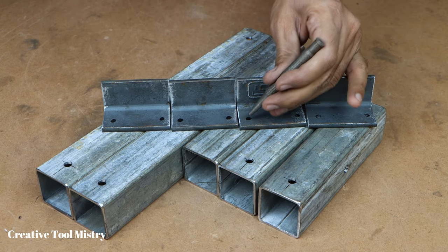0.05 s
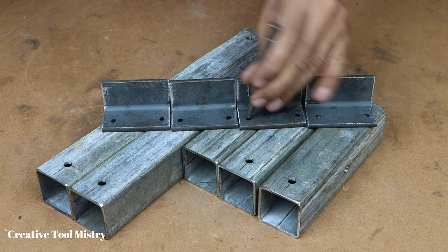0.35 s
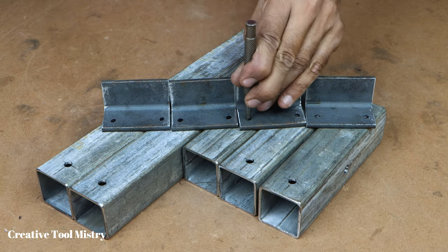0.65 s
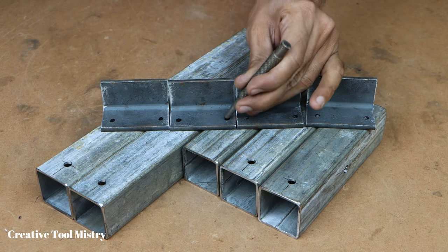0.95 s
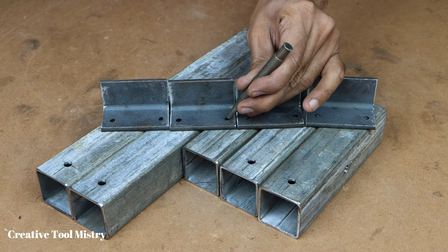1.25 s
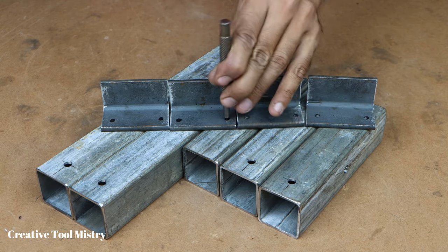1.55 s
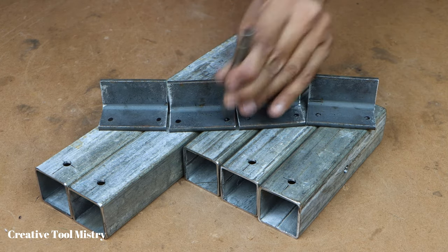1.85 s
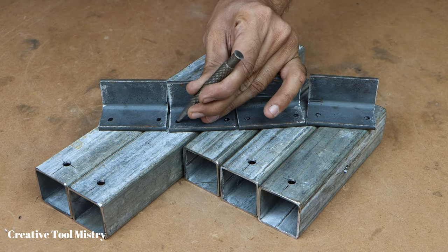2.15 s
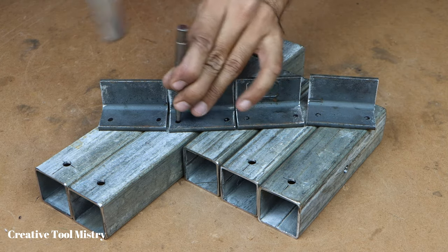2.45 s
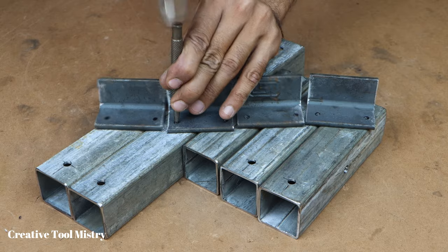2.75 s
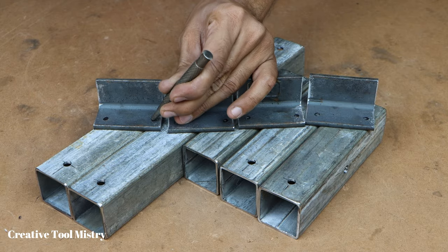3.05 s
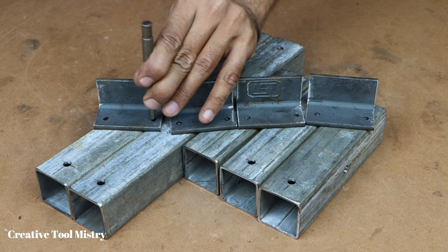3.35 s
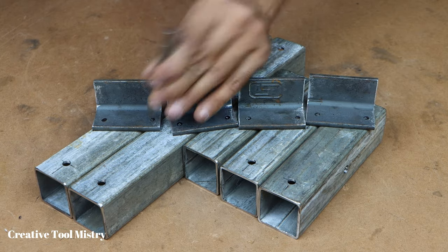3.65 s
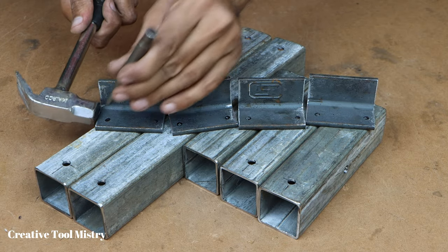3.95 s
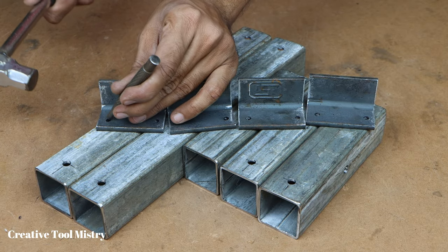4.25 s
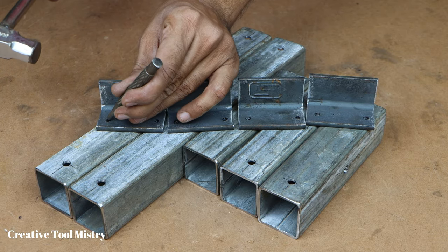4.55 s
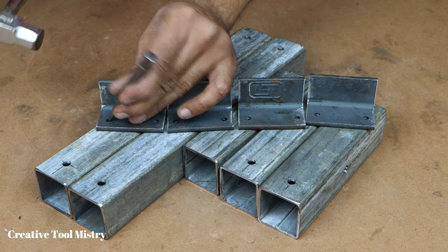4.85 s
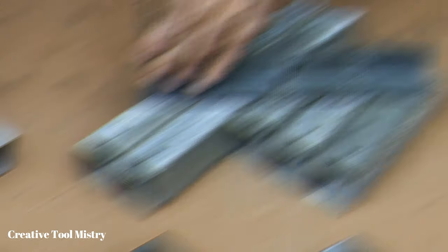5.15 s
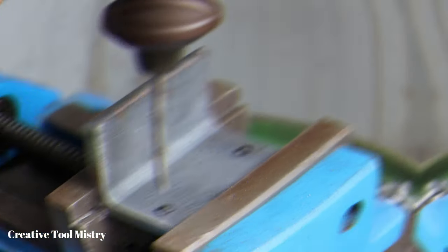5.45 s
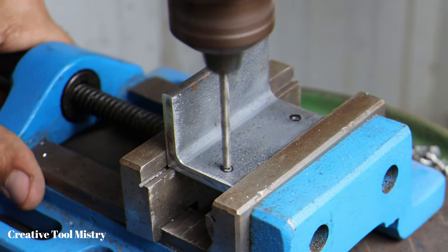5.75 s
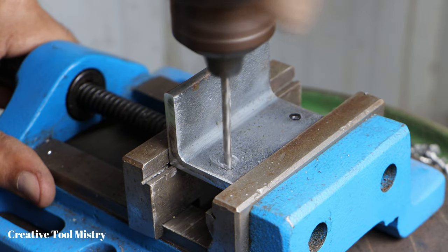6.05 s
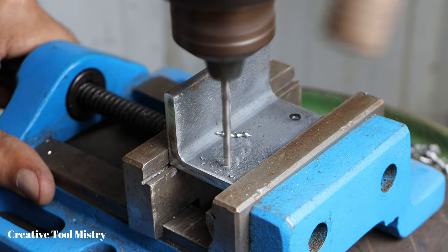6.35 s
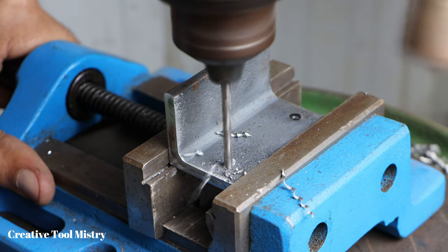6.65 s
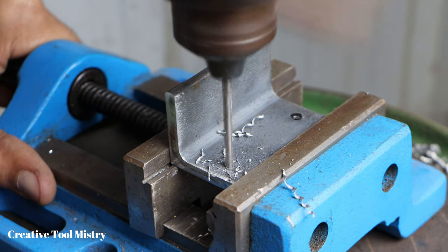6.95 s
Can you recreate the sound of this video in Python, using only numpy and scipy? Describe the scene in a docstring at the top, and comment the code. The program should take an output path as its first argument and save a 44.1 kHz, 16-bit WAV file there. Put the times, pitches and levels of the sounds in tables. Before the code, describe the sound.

Five ringing pairs of hammer taps on a metal punch give way abruptly to a drill press boring steel.

```python
"""In a small workshop, loose square tubes are still ringing from a hammer blow. Five double taps follow,
as a centre punch marks the steel angles lying on them: each blow cracks, thuds into the bench and sets
the tubes chattering. Before the last pair, steel clinks lightly and a hand nudges the stack.
The bench fades under two dull knocks. Then, abruptly, a drill press is boring the steel:
the motor hums, the vice shakes, the bit scrapes and chips snap off."""
import sys
import numpy as np
from scipy import signal
from scipy.fft import rfft, irfft
from scipy.io import wavfile
from scipy.ndimage import uniform_filter1d

SR = 44100
rng = np.random.default_rng(int(sys.argv[2]) if len(sys.argv) > 2 else 0)


def unload_audio(sound):
    """Save the sound as a 16-bit wav file, at the path given as the first command line argument."""
    columns = np.transpose(np.atleast_2d(sound))
    # keep every value between -1 and 1, then stretch to whole-number steps
    steps = np.round(np.clip(columns, -1, 1) * 32767)
    wavfile.write(sys.argv[1], SR, steps.astype(np.int16))


N = 317520
TIME = np.arange(N) / SR
DRILL_START_S = 5.675


def amp(db):
    """Decibels to gain."""
    return 10 ** (np.asarray(db) / 20)


def unit(x):
    """Scales to rms 1."""
    return x / np.sqrt(np.mean(x ** 2) + 1e-20)


def curve(points, hz):
    """Interpolates a table over log frequency."""
    f, value = np.transpose(points)
    return np.interp(np.log(hz + 1), np.log(f + 1), value)


def lifts(resonances, hz):
    """Gain in dB of a set of resonances."""
    return sum(db / (1 + (2 * (hz - f) / width) ** 2) for f, width, db in resonances)


def sides(balance, hz):
    """Constant-power left and right gains."""
    ratio = amp(curve(balance, hz)) ** 2
    return np.sqrt(2 * np.array([ratio, np.ones_like(ratio)]) / (1 + ratio))


def noise(size, spectrum, balance, resonances=(), tilt_db=0):
    """Coloured stereo noise, rms 1."""
    hz = np.fft.rfftfreq(size, 1 / SR)
    colour_db = curve(spectrum, hz) + lifts(resonances, hz) + tilt_db * np.log2(1 + hz / 1000)
    white = rfft(rng.standard_normal((2, size)))
    return unit(irfft(white * amp(colour_db) * sides(balance, hz), size))


def coloured(x, points):
    """Filters x by a dB curve; rms 1."""
    size = x.shape[-1]
    hz = np.fft.rfftfreq(size, 1 / SR)
    return unit(irfft(rfft(x) * amp(curve(points, hz)), size))


def drift(rate_hz):
    """Smooth random motion, rms 1."""
    hz = np.fft.rfftfreq(N, 1 / SR)
    return unit(irfft(rfft(rng.standard_normal(N)) * np.exp(-(hz / rate_hz) ** 2), N))


# Each row: blow in s, rebound in s, crack in dB, clank in Hz, chatter in dB, thud in dB, rebound thud
# in dB, extra rebound rattle in dB, hum in dB, tilt in dB/octave, tube ring in Hz, note of the punched
# piece in Hz, note in dB. Levels are relative.
DOUBLE_TAPS = [(-.315, -0.173, -12, 1100, -21.5, -25, -25, 3, -44, -2.5, 770, 5680, -44),
               (0.6359, 0.782, -12, 1170, -22, -20.5, -25, 5.5, -36, -0.5, 760, 5670, -39),
               (1.7285, 1.8755, -12.5, 1170, -21.5, -25.5, -25.5, 2.5, -35.5, -1.4, 737, 2200, -39),
               (2.6965, 2.8363, -12.5, 1360, -19.5, -19.5, -20, 6, -32.5, 0, 765, 4890, -39),
               (3.5334, 3.6727, -12, 960, -22.5, -19.5, -38, 9.5, -41, 2.26, 840, 5000, -35.5),
               (5.174, 5.321, -11, 970, -21, -18, -21.5, 6, -45, -1, 800, 4940, -49)]

def punching(crack_gain_db=3, chatter_gain_db=3, thud_gain_db=6, held_rattle_db=-2):
    """Two blows per mark; the rebound cracks weaker and higher, and the piece, jarred loose, rattles."""
    out, t = np.zeros((2, N)), np.arange(-SR // 50, SR * 39 // 50) / SR
    held_clang, free_clang = (660, 210, -3), (670, 75, 4.8)  # Hz, width in Hz, lift in dB
    for (blow_s, rebound_s, crack_db, clank_hz, chatter_db, thud_db, rebound_thud_db, rattle_db,
         hum_db, tilt_db, ring_hz, note_hz, note_db) in DOUBLE_TAPS:
        modes = steel_modes()
        mark = (hum_db, tilt_db, ring_hz, note_hz, note_db - chatter_db)
        crack_db += crack_gain_db
        chatter_db += chatter_gain_db
        first = blow(t, modes, crack_db, clank_hz, held_clang, chatter_db,
                     thud_db + thud_gain_db, held_rattle_db, *mark)
        rebound = blow(t, modes, crack_db - 1.5, clank_hz * 1.097, free_clang, chatter_db - 0.08,
                       rebound_thud_db + thud_gain_db, held_rattle_db + rattle_db, *mark)
        add(out, blow_s + t[0], first)
        add(out, rebound_s + t[0], rebound)
    return out


def blow(t, modes, crack_db, clank_hz, clang, chatter_db, thud_db, rattle_db,
         hum_db, tilt_db, ring_hz, note_hz, note_db, boom_db=-18):
    """One blow excites the punch, the bench and the tubes."""
    bench = amp(thud_db) * (thud(t) + amp(boom_db) * boom(t))
    tubes = amp(chatter_db) * chatter(t, tilt_db, ring_hz, note_hz, note_db, rattle_db, modes)
    tubes += amp(hum_db) * stack_hum(t)
    return amp(crack_db) * crack(t, tilt_db, clank_hz, clang, modes) + bench + tubes


def steel_modes(spacing_hz=54.93, scatter_db=2.5):
    """Dense modes of random strength at one place on the steel, as a dB curve; flatter in the bass."""
    hz = np.arange(0, SR / 2, spacing_hz)
    db = scatter_db * np.clip(hz / 3000, 0, 1.3) * rng.standard_normal(len(hz))
    return np.transpose([hz, db])


# Crack spectrum. Each row: frequency in Hz, density in dB.
CRACK_SPECTRUM = [(88, -25), (160, -8.5), (456, -13.5), (770, 2), (1000, -4.5), (1500, -6), (1850, -8.5),
                  (3080, -9.5), (3460, -10), (4730, -10), (5400, -16), (9500, -16.5), (13500, -31),
                  (15800, -47.5)]
# Each row: frequency in Hz, left minus right in dB.
CRACK_SIDES = [(100, 1), (350, -14.5), (700, -16), (1300, -3.5), (4400, -1), (15000, 1)]

def crack(t, tilt_db, clank_hz, clang, modes, rise_s=0.0062, fall_s=0.0054,
          ring_share=0.28, ring_t60_s=0.12, tick_db=-7, tick_s=0.0026):
    """Hammer on punch on steel: a clank of milliseconds, brightest at its peak, then a brief ring."""
    clank = noise(len(t), CRACK_SPECTRUM, CRACK_SIDES, [(clank_hz, 330, 8), clang], tilt_db)
    clank = coloured(clank, modes)
    tick = noise(len(t), CRACK_SPECTRUM, CRACK_SIDES, tilt_db=7) * np.exp(-(t / tick_s) ** 2)
    swell = np.exp(-abs(t / rise_s) ** 3.34)
    collapse = (1 - ring_share) * np.exp(-(t / fall_s) ** 2)
    ring = ring_share * amp(-60 * abs(t) / ring_t60_s)
    return clank * np.where(t < 0, swell, collapse + ring) + amp(tick_db) * tick


# Chatter spectrum. Each row: frequency in Hz, density in dB.
CHATTER_SPECTRUM = [(40, -20), (110, -14.5), (260, -15.5), (520, -14), (640, -10), (1000, -10),
                    (1500, -14.5), (2600, -13), (3900, -23), (5200, -24), (7500, -29.5), (10800, -34),
                    (13000, -46.5), (14500, -73)]
# Each row: frequency in Hz, left minus right in dB.
CHATTER_SIDES = [(60, 6), (130, -9.5), (700, -12.5), (1300, 0.5), (4400, 1), (15000, -3.5)]
# Tubes and angles. Each row: centre in Hz, width in Hz, lift in dB.
TUBE_RESONANCES = [(213, 34, 5.5), (375.4, 59, 11.5), (719, 88, 10.5), (826, 100, 7.5), (1444, 46, 7.5),
                   (2290, 83, 5), (3120, 70, 4.5), (3327, 65, 6), (4040, 90, 6), (5090, 200, -0.5),
                   (5860, 120, 9), (7000, 150, 9), (8500, 50, 8), (9140, 70, 6), (9550, 110, 7),
                   (10900, 280, 7)]
# Chatter decay. Each row: frequency in Hz, T60 in seconds.
CHATTER_T60 = [(100, 0.64), (210, 1), (330, 0.26), (750, 0.32), (1840, 0.35), (4850, 0.27), (12800, 0.068)]

def chatter(t, tilt_db, ring_hz, note_hz, note_db, rattle_db, modes,
            hold_s=0.077, sag_db_per_s=18, treble_sag_db_per_s=40):
    """The loose tubes rattle near full strength, then ring out, treble first."""
    struck_tube, loose_piece = (ring_hz, 71, 4), (2950, 1300, rattle_db)
    resonances = TUBE_RESONANCES + [struck_tube, loose_piece]
    tubes = noise(len(t), CHATTER_SPECTRUM, CHATTER_SIDES, resonances, tilt_db)
    note_band = lifts([(note_hz, 230, 1)], np.fft.rfftfreq(len(t), 1 / SR))
    note = unit(irfft(rfft(rng.standard_normal((2, len(t)))) * note_band, len(t)))
    steel = coloured(tubes + amp(note_db) * note, modes)
    hz, frame_s, bands = signal.stft(steel, SR, nperseg=512)
    age = frame_s + t[0]
    treble = np.clip(hz / 10000, 0, 1)[:, None]
    sag_db = (sag_db_per_s + treble_sag_db_per_s * treble) * np.clip(age, 0, hold_s)
    decay_db = 60 * np.maximum(age - hold_s, 0) / curve(CHATTER_T60, hz)[:, None]
    ringing = signal.istft(bands * amp(-sag_db - decay_db), SR, nperseg=512)[1][:, :len(t)]
    return ringing * np.clip(t / 0.005 + 1, 0, 1)


def thud(t, t60_s=0.18, left_db=-12):
    """The bench gives under the blow: four low modes, stronger on the right."""
    age = np.maximum(t + 0.0029, 0)
    ring = sum(amp(db) * np.sin(2 * np.pi * (hz * rng.uniform(0.984, 1.006) * age + rng.random((2, 1))))
               for hz, db in [(195, 0), (150, -7), (245, -8), (330, -10)])
    return ring * (1 - np.exp(-age / 0.0013)) * amp(-60 * age / t60_s) * amp([[left_db], [0]])


def boom(t, nominal_hz=74, peak_s=0.067, half_length_s=0.04):
    """The whole bench swings briefly under the load."""
    swell = np.exp(-((t - peak_s) / half_length_s) ** 2) * np.clip(t / .01, 0, 1)
    hz = nominal_hz * rng.uniform(.88, 1.13)
    phase = rng.random() + .15 * rng.standard_normal((2, 1))
    return swell * np.sin(2 * np.pi * (hz * t + phase))


# Hollow stack. Each row: mode in Hz, relative level in dB.
STACK_MODES = [(196, 0), (211, 0.5), (228, -1), (720, -6.5)]

def stack_hum(t, t60_s=0.93, left_db=-9):
    """Close low modes of the stack beat and hum on after the chatter."""
    age = np.maximum(t, 0)
    ring = sum(amp(db) * np.sin(2 * np.pi * (hz * age + rng.random((2, 1)))) for hz, db in STACK_MODES)
    return ring * (1 - np.exp(-age / 0.05)) * amp(-60 * age / t60_s) * amp([[left_db], [0]])


# Vibration under the hand feed. Each row: time in seconds, frame drone and motor hum in relative dB.
VIBRATION = [(5.7, -23.5, -40), (5.87, -24.5, -19), (5.98, -26, -29), (6.3, -18, -26), (6.48, -23.5, -38),
             (6.6, -20, -22), (6.89, -19.5, -25), (7.01, -26.5, -38), (7.11, -17.5, -34)]
# Shaking frame. Each row: frequency in Hz, density in dB.
RUMBLE_SPECTRUM = [(20, -18), (50, -13), (80, -6), (130, -3.5), (200, 1), (260, -5.5), (330, -11),
                   (470, -11.5), (570, -31), (900, -65)]
# Belt and bearings. Each row: frequency in Hz, relative level in dB.
WHINE_TONES = [(400, -48.5), (473, -45), (1194, -45), (1288, -44), (1382, -56.5), (1746, -48), (2087, -44),
               (2584, -56)]
# Each row: frequency in Hz, left minus right in dB.
DRILL_SIDES = [(60, 1), (110, 3.5), (200, -2.5), (380, -8), (700, -9.5), (1290, -4.5), (2380, 2), (4400, 1),
               (8120, -2.5), (15000, 0)]

def drill_press(flutter_db=3, throb_db=3, throb_hz=10):
    """Mains hum of the motor, throbbing drone and rumble of the frame, thin whine of the drive."""
    s, drone_db, hum_db = np.transpose(VIBRATION)
    hum_db, drone_db = np.interp(TIME, s, hum_db), np.interp(TIME, s, drone_db)
    drone_db += throb_db * np.cos(2 * np.pi * throb_hz * (TIME - DRILL_START_S))
    hum = amp(hum_db + 1.5 + flutter_db * drift(40)) * drill_tone(100.5, waver_hz=6.02, rate_hz=32)
    drone = amp(drone_db - 3 + flutter_db * drift(40)) * drill_tone(187, waver_hz=8.88, rate_hz=30.5)
    shaking_db = .5 * (drone_db - np.median(drone_db[TIME > DRILL_START_S])) + 3.9 * drift(30)
    rumble = amp(shaking_db - 23) * noise(N, RUMBLE_SPECTRUM, DRILL_SIDES)
    whine = sum(amp(db) * drill_tone(hz, waver_hz=9.05, rate_hz=39.8) for hz, db in WHINE_TONES)
    return hum + drone + rumble + amp(load_db() + 1.5) * whine


def drill_tone(hz, waver_hz, rate_hz):
    """A tone of rms 1; its pitch wavers differently at each ear."""
    pitch_hz = hz + waver_hz * np.array([drift(rate_hz), drift(rate_hz)])
    turns = np.cumsum(pitch_hz, axis=1) / SR + rng.random((2, 1))
    return np.sqrt(2) * np.sin(2 * np.pi * turns) * sides(DRILL_SIDES, hz)[:, None]


def load_db(first_touch_db=-4.5, sink_s=.24):
    """Load relative to the full cut as the bit sinks in."""
    return np.interp(TIME - DRILL_START_S, [0, sink_s], [first_touch_db, 0])


# Cutting edge. Each row: frequency in Hz, density in dB.
CUTTING_SPECTRUM = [(300, -37), (570, -8.5), (850, -6), (1100, -10), (1300, -0.5), (1550, -7), (2100, -2.5),
                    (2800, -9.5), (3230, -8.5), (3500, -18), (4750, -18.5), (5150, -27.5), (6500, -32.5),
                    (14000, -49.5)]
# Vice and workpiece. Each row: centre in Hz, width in Hz, lift in dB.
VICE_RESONANCES = [(751.5, 96, 14.5), (954, 59, 7), (1214, 28, 13.5), (1747, 106, 9), (2545, 75, 8.5),
                   (3050, 120, 6), (3660, 69, 6), (4110, 90, 7), (4710, 88, 4.5), (5670, 170, 9)]

def cutting(level_db=-27, grab_db=0.84, turn_db=0.36, turn_hz=27.8, churn_db=1.3):
    """The edge scrapes through the vice's resonances, grabbing unevenly and pulsing with each turn."""
    bite_db = load_db() + grab_db * drift(120) + turn_db * np.sin(2 * np.pi * turn_hz * TIME)
    bands = signal.stft(noise(N, CUTTING_SPECTRUM, DRILL_SIDES, VICE_RESONANCES), SR, nperseg=512)[2]
    # curling chips keep shifting the colour
    churn = uniform_filter1d(rng.standard_normal(bands.shape[1:]), size=6, axis=0)
    churn = unit(uniform_filter1d(churn, size=6, axis=1))
    scrape = signal.istft(bands * amp(churn_db * churn), SR, nperseg=512)[1][:, :N]
    return amp(level_db + bite_db) * unit(scrape)


# Each row: peak time in seconds, level in dB, pitch in Hz, half length in seconds.
KNOCKS = [(5.386, -10, 150, 0.0032), (5.42, -19.5, 111, .01), (6.04, -12, 105.5, .022),
          (6.185, -12, 162, 0.0091), (6.272, -1.5, 165, 0.0046), (6.314, -6.5, 168.7, 0.012),
          (6.385, -7.5, 170, 0.0094), (6.569, -3.5, 155, 0.0042), (6.803, -7, 183, 0.0096),
          (6.88, -9, 199, 0.017)]

def knocks(spread_cycles=0.15):
    """Bench and vice knock dully: low shudders of a few cycles."""
    out, t = np.zeros((2, N)), np.arange(-SR // 20, SR // 20) / SR
    for s, db, hz, half_length_s in KNOCKS:
        phase = rng.random() + spread_cycles * rng.standard_normal((2, 1))
        swell = np.exp(-(t / half_length_s) ** 2)
        add(out, s + t[0], amp(db) * swell * np.cos(2 * np.pi * (hz * t + phase)))
    return out


# Each row: start in seconds, level in dB, pitch in Hz.
LARGE_CHIPS = [(5.944, -32, 4950), (5.95, -23.5, 3010), (6.061, -33, 4700), (6.185, -34, 5630),
               (6.619, -40, 4800), (6.738, -34, 4700), (6.955, -28, 4800)]

def chips(t60_s=0.055, width_hz=450, ring_db=16, fine_per_s=5.6, fine_db=-46, fine_hz=4730):
    """Each chip snaps with a bright scratch; fine ones break at random among the large."""
    out, t = np.zeros((2, N)), np.arange(SR // 8) / SR
    snap_spectrum = [(800, -41), (3000, 8), (5000, -4), (8000, -16), (14000, -27)]  # Hz, dB
    fine_chips = [(s + rng.random() / fine_per_s,
                   fine_db + 8 * rng.uniform(-1, 1),
                   fine_hz * (1 + .12 * rng.uniform(-1.1, 1)))
                  for s in np.arange(DRILL_START_S, N / SR, 1 / fine_per_s)]
    for s, db, hz in LARGE_CHIPS + fine_chips:
        burst = noise(len(t), snap_spectrum, DRILL_SIDES, [(hz, width_hz, ring_db)])
        add(out, s, amp(db - 60 * t / t60_s) * (1 - np.exp(-t / 0.00062)) * burst)
    return out


# Each row: start in seconds, level in dB.
CLINKS = [(3.899, -41)]
# Each row: mode in Hz, relative level in dB, T60 in seconds.
CLINK_MODES = [(2277, -4.5, 0.21), (3070, -1.5, 0.14), (4170, 8, 0.058), (5835, -10, 0.19)]

def clinks(touch_s=0.0036):
    """Steel touches steel: a soft tick rings on in a few clear modes."""
    out, t = np.zeros((2, N)), np.arange(SR // 2) / SR
    for s, level_db in CLINKS:
        ring = sum(amp(db - 60 * t / t60_s) * np.sin(2 * np.pi * (hz * t + rng.random((2, 1))))
                   for hz, db, t60_s in CLINK_MODES)
        touch = noise(len(t), CRACK_SPECTRUM, CRACK_SIDES, tilt_db=-4) * np.exp(-t / touch_s)
        add(out, s, amp(level_db) * (ring + touch) * (1 - np.exp(-t / 0.00061)))
    return out


# Each row: peak time in seconds, level in dB.
NUDGES = [(4.08, -49.5)]

def nudges(half_length_s=.022):
    """The tubes murmur, pushed by the hand setting the punch."""
    out, t = np.zeros((2, N)), np.arange(-SR // 10, SR // 10) / SR
    for s, db in NUDGES:
        murmur = noise(len(t), CHATTER_SPECTRUM, CHATTER_SIDES, TUBE_RESONANCES, tilt_db=-4)
        add(out, s + t[0], amp(db) * np.exp(-(t / half_length_s) ** 2) * murmur)
    return out


# Room noise. Each row: frequency in Hz, density in dB.
AIR_SPECTRUM = [(15, -38.5), (25, -1.5), (91, -2), (205, -1.5), (248, -4.5), (291, -8), (382, -3.5),
                (414, -8), (750, -7), (1320, -12.5), (1470, -12), (6860, -21.5), (15800, -35)]
# Each row: frequency in Hz, left minus right in dB.
AIR_SIDES = [(60, -4.0), (180, -4), (550, -3.0), (1650, 0), (4970, 1), (15000, 0)]

def air(level_db=-51.5):
    """The steady quiet of the workshop."""
    return amp(level_db) * noise(N, AIR_SPECTRUM, AIR_SIDES)


def add(mix, start_s, sound):
    """Mixes a sound in at start_s, trimmed to fit."""
    start = round(start_s * SR)
    sound = sound[..., max(-start, 0):]
    part = mix[:, max(start, 0):][:, :sound.shape[-1]]
    part += sound[..., :part.shape[1]]


def scene(fade_start_s=5.28, fade_db=-8):
    """The punching fades; the drill cuts in, already at work."""
    fade = amp(np.interp(TIME, [fade_start_s, DRILL_START_S], [0, fade_db]))
    drill_gate = np.clip((TIME - DRILL_START_S) / 0.00052, 0, 1)
    bench = air() + punching() + clinks() + nudges()
    return fade * bench + knocks() + drill_gate * (drill_press() + cutting() + chips())


def record(dry, ceiling=.95, cutoff_hz=15900):
    """Soft peak limiting, then a low-pass."""
    rounded = dry / (1 + (dry / ceiling) ** 4) ** .25
    low_pass = signal.firwin(401, cutoff_hz, window=("kaiser", 9), fs=SR)
    return signal.oaconvolve(rounded, low_pass[None], "same")


dry = scene()
out = record(dry)
unload_audio(out)
```